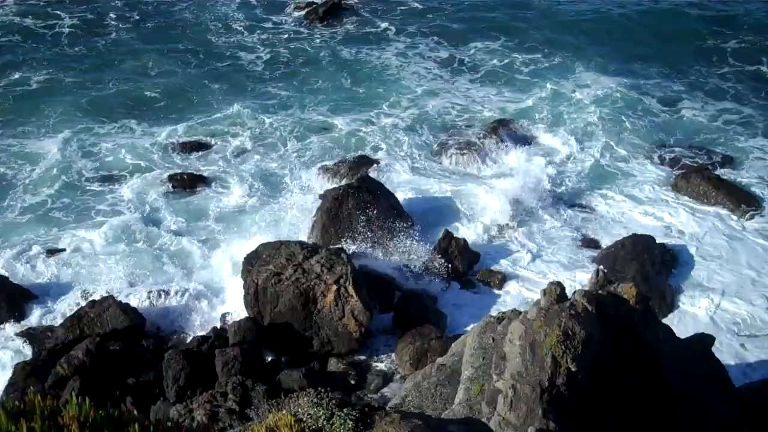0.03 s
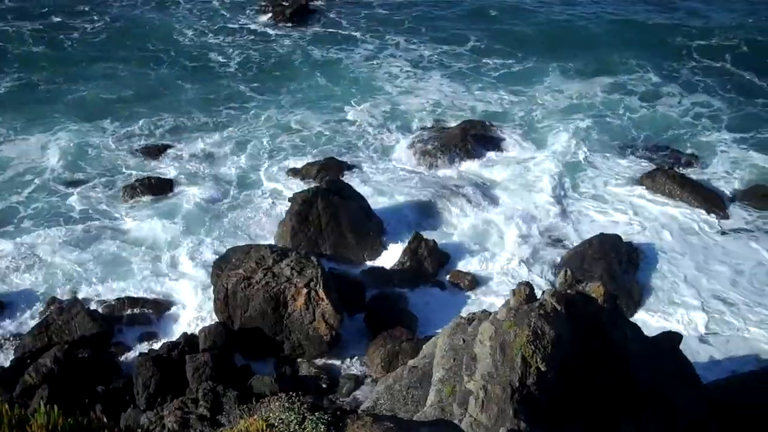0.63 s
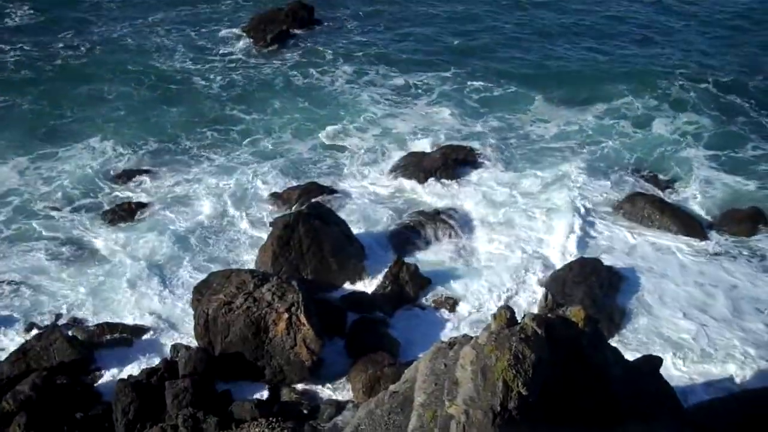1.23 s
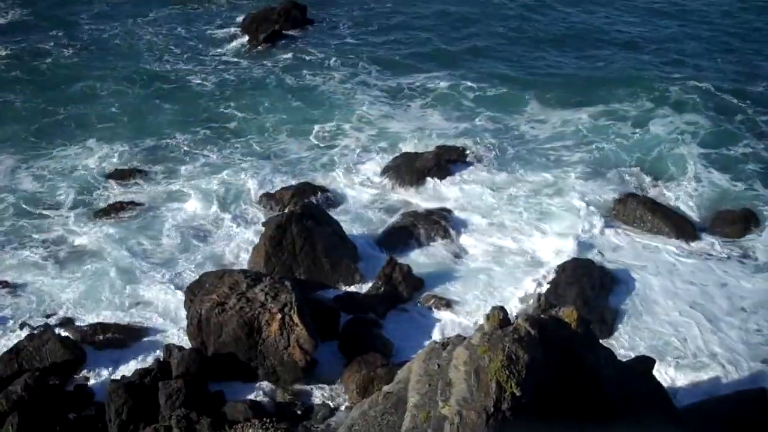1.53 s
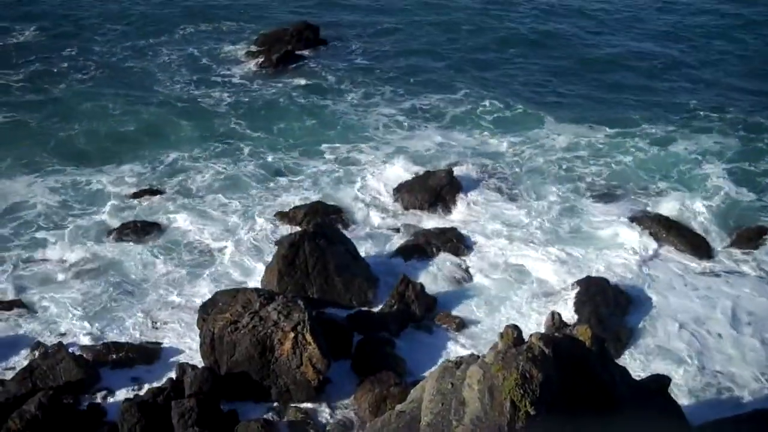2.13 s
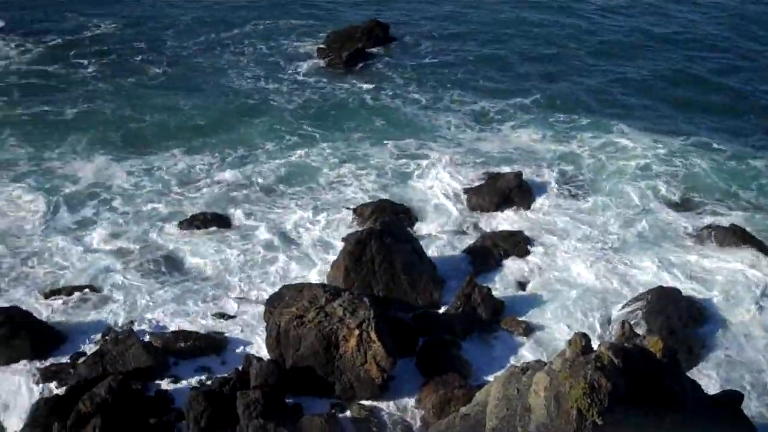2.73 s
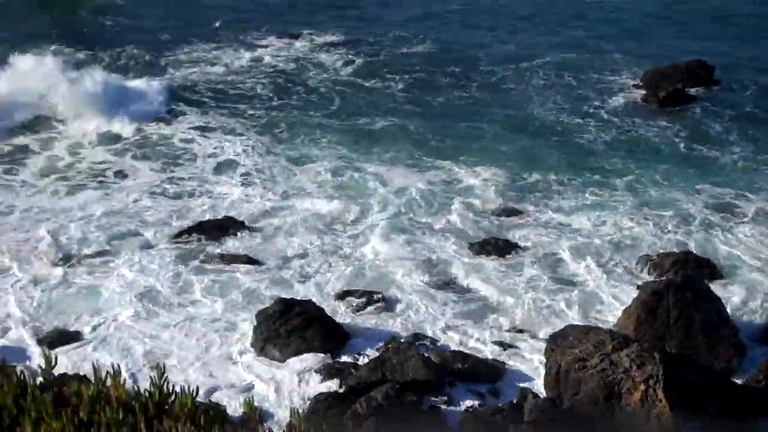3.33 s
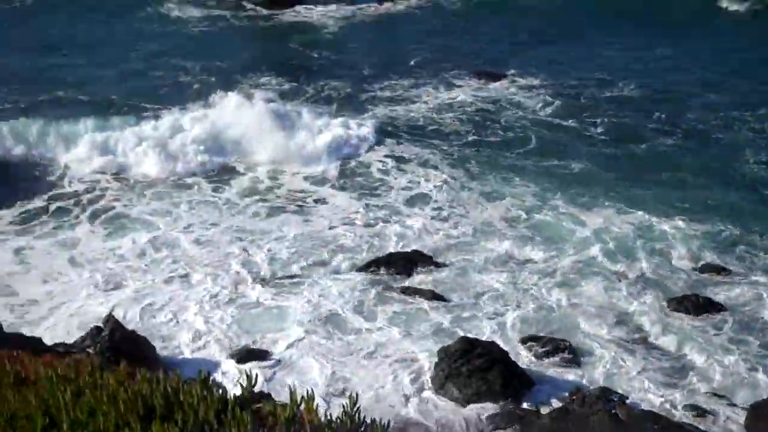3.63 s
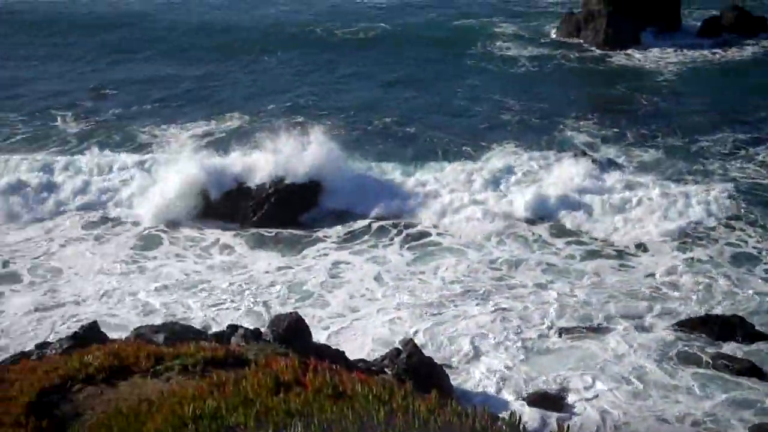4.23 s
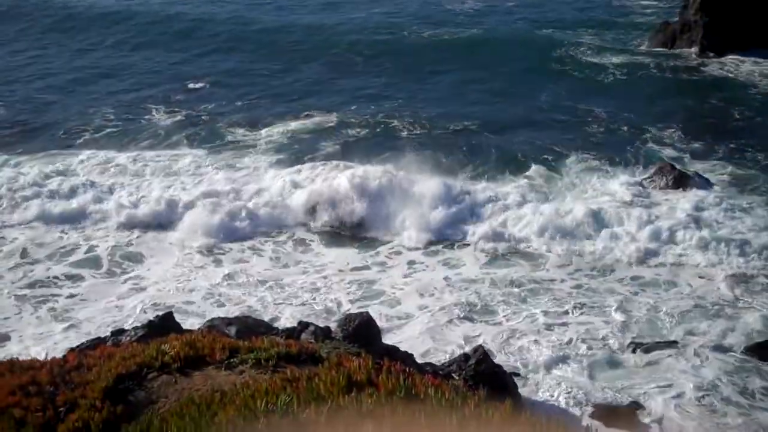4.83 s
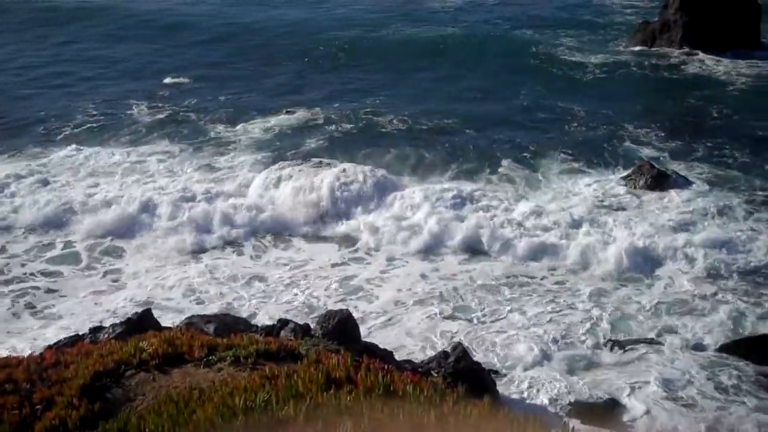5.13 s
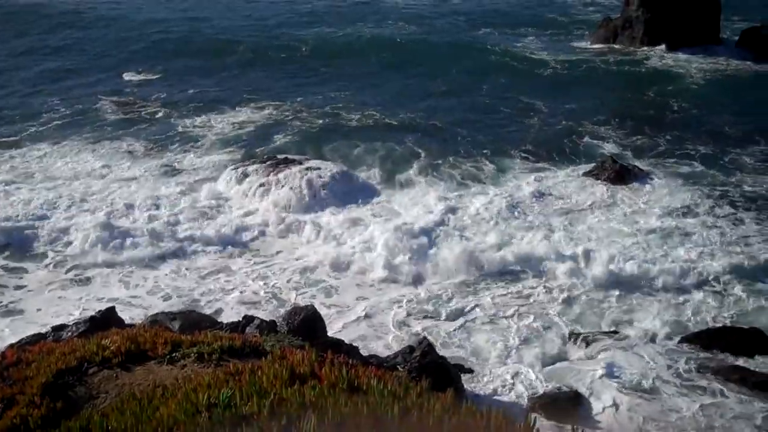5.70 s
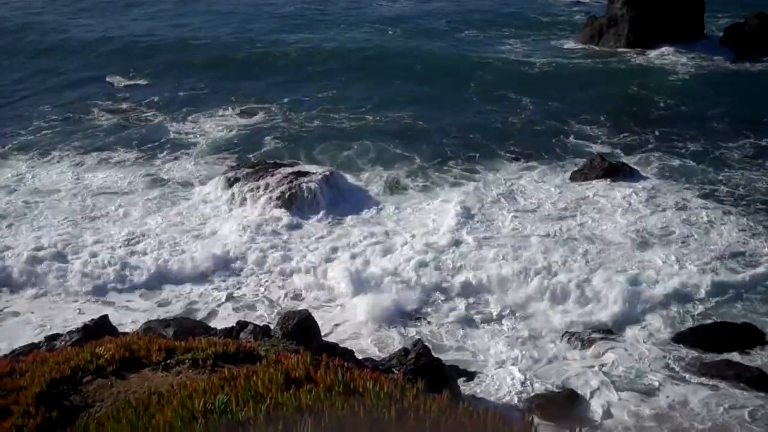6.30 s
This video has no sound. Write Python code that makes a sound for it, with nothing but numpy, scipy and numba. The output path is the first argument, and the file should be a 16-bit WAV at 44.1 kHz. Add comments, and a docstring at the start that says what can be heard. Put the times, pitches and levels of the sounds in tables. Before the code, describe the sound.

Ocean surf roars steadily over coastal rocks, swelling gently as waves burst into hissing spray, heard from a bluff above.

```python
"""A wave bursts on the rocks over the steady roar of surf, heard from the bluff above.
Air trapped in water rings at a pitch set by its size: big pockets roar, bubble clouds wash over the
rocks and fine spray hisses, all above a low rumble. The roar has brief hollow swells. One wave drains
away; the next rolls in and bursts on a boulder. The sound enters the two small ports of a hand-held
camera: turning it shifts the delay between them, and each port adds its own treble resonance."""
import sys
import numpy as np
from scipy import signal
from scipy.fft import rfft, irfft
from scipy.io import wavfile
from scipy.ndimage import uniform_filter1d, map_coordinates
from numba import njit

SR = 44100
rng = np.random.default_rng(int(sys.argv[2]) if len(sys.argv) > 2 else 0)


def inscribe(sig):
    """Save sig as 16-bit PCM at rate SR to the path in sys.argv[1].

    A 1-D sig is mono; a 2-D sig holds one channel per row.
    Samples are clipped to [-1, 1] before scaling.
    """
    pcm = np.round(np.clip(np.atleast_2d(sig).T, -1, 1) * 32767)
    wavfile.write(sys.argv[1], SR, pcm.astype(np.int16))


N = 284886
TIME = np.arange(N) / SR
FREQ = np.maximum(np.arange(N // 2 + 1) * SR / N, 1)
PAN = np.array([[.5], [-.5]])  # splits a left-minus-right level difference between the ports


def undb(db):
    """Decibels to amplitude ratio."""
    return 10 ** (np.asarray(db) / 20)


def unit(x):
    """Normalisation to rms 1."""
    return x / np.sqrt(np.mean(x ** 2))


def spectrum_at(table, hz):
    """Interpolation on a log-frequency axis."""
    table_hz, value = np.transpose(table)
    return np.interp(np.log(hz), np.log(table_hz), value)


def wander(rate_hz):
    """Random modulation: straight ramps between random values, rms 1."""
    step = max(int(SR / rate_hz), 2)
    held = np.repeat(rng.standard_normal(N // step + 1), step)
    return unit(uniform_filter1d(held, step)[:N])


# Likeness of the surf at the two ports: frequency_hz, coherence (0 to 1)
COHERENCE = [(25, .4), (60, 0.78), (130, 1), (750, 0.95), (1400, 0.78), (2050, 0.68), (2600, 0.82),
             (4200, 0.17), (5400, 0.48), (7000, 0.27), (9000, 0.04), (14000, 0.4)]


def noise_cloud(spectrum, width, surge_db, surge_hz, flicker_db, flicker_hz):
    """Incoherent summation: countless sources merge into noise; bands surge together, flicker apart."""
    spectra = rfft(rng.standard_normal((2, N))) * undb(spectrum_at(spectrum, FREQ))
    surge = surge_db * wander(surge_hz)
    half_octaves = 2 * np.log2(FREQ)
    low_hz, high_hz = spectrum[0][0], spectrum[-1][0]
    out = 0
    for band in range(int(2 * np.log2(low_hz)), int(2 * np.log2(high_hz)) + 2):
        window = np.sqrt(np.maximum(1 - np.abs(half_octaves - band), 0))
        mid, side = irfft(spectra * window, N)
        # a wider front of surf reaches the two ports less alike
        coherence = np.clip(spectrum_at(COHERENCE, 2 ** (band / 2)), .001, 1) ** width
        mid, side = mid * np.sqrt(1 + coherence), side * np.sqrt(1 - coherence)
        gain = undb(surge + flicker_db * wander(flicker_hz))
        out = out + gain * np.array([mid + side, mid - side])
    return unit(out)


@njit
def ring(starts, hz, cycles, gains, glide):
    """Damped oscillation: each bubble rings down, its pitch rising as it nears the surface."""
    out = np.zeros((2, N))
    for k in range(len(starts)):
        length = int(cycles[k] * SR / hz[k])
        for i in range(min(length, N - starts[k])):
            age = i / length
            pressure = np.exp(-5 * age) * np.sin(2 * np.pi * cycles[k] * age * (1 + glide * age / 2))
            out[0, starts[k] + i] += gains[k, 0] * pressure
            out[1, starts[k] + i] += gains[k, 1] * pressure
    return out


def bubbles(low_hz, high_hz, cycles, scatter_db, pan_db, glide, count):
    """Bubble resonance: the nearest bubbles ring singly at random times, many faint, a few strong."""
    when, pitch, life, size, place = rng.random((count, 5)).T
    starts = (when * N).astype(np.int64)
    hz = low_hz * (high_hz / low_hz) ** pitch
    level_db = -scatter_db * np.log(np.maximum(size, .01))
    gains = undb(level_db[:, None] + pan_db * np.outer(place - .5, [1, -1]))
    return unit(ring(starts, hz, cycles * (.5 + life), gains, glide))


# Spectrum of the deep rumble: frequency_hz, level_db
RUMBLE_SPECTRUM = [(20, -13), (45, -6), (72, -1.5), (150, -0.5), (230, -2.5), (400, -18)]


def rumble(width):
    """Low-frequency radiation: the weight of falling water shakes the air."""
    body = noise_cloud(RUMBLE_SPECTRUM, width, surge_db=1, surge_hz=8, flicker_db=.8, flicker_hz=12)
    return undb(-12) * body


# Brief hollow swells in the roar: start_s, pitch_hz, level_db, decay_s
HOLLOW_SWELLS = [(1.77, 860, -22, .05), (2.83, 805, -22, .05), (3.88, 750, -23.5, 0.081)]


def hollow_swells():
    """Band-pass resonance: noise near 800 Hz rises and dies away, a brief hollow note in the roar."""
    quality, attack_s = 4, .008
    out = np.zeros(N)
    for start_s, pitch_hz, level_db, decay_s in HOLLOW_SWELLS:
        resonance = 1 / (1 + 1j * quality * (FREQ / pitch_hz - pitch_hz / FREQ))
        hollow = unit(irfft(rfft(rng.standard_normal(N)) * resonance, N))
        age = np.maximum(TIME - start_s, 0)
        out += undb(level_db) * hollow * (1 - np.exp(-age / attack_s)) * np.exp(-age / decay_s)
    return out


# Spectrum of the spray: frequency_hz, level_db
SPRAY_SPECTRUM = [(700, -37), (2000, -2), (3500, 3), (4500, 1.5), (7000, -2), (8800, -7), (11500, -7),
                  (14000, -6.5)]


def spray(width):
    """Impact noise and small-bubble resonance: drops fall back and the foam fizzes."""
    body = noise_cloud(SPRAY_SPECTRUM, width, surge_db=.46, surge_hz=25, flicker_db=.5, flicker_hz=30)
    fizz = bubbles(3220, 10000, cycles=4.2, scatter_db=2.4, pan_db=6, glide=.1, count=14000)
    return undb(-4) * body + undb(-12) * fizz


# Spectrum of the foaming water: frequency_hz, level_db
WASH_SPECTRUM = [(300, -27), (900, -10.5), (1400, -0.5), (1900, -1.5), (3000, -6.5), (5000, -22.5),
                 (10000, -22.5)]


def wash(width):
    """Air entrainment: water churning between rocks folds in mid-sized bubbles that gurgle."""
    body = noise_cloud(WASH_SPECTRUM, width, surge_db=.5, surge_hz=18, flicker_db=.7, flicker_hz=22)
    gurgle = bubbles(990, 3150, cycles=18.6, scatter_db=3.5, pan_db=9, glide=.16, count=4000)
    return undb(.5) * body + undb(-8.5) * gurgle


# Spectrum of the breakers: frequency_hz, level_db
ROAR_SPECTRUM = [(120, -18), (210, -9), (290, -3.5), (490, -6.5), (630, -1), (780, 0.5), (1100, -4),
                 (1800, -25), (3500, -48)]


def roar(width):
    """Bubble resonance, lower for larger sizes: the big air pockets trapped by breakers gulp."""
    body = noise_cloud(ROAR_SPECTRUM, width, surge_db=.44, surge_hz=15, flicker_db=.3, flicker_hz=18)
    gulps = bubbles(228, 980, cycles=16, scatter_db=4.5, pan_db=1, glide=.14, count=1500)
    return undb(.15) * body + undb(-13.5) * gulps


# Churning of the water as one wave drains and the next rolls in: time_s, level_db
SWELL_LEVELS = [(0.3, -25), (0.75, -27.5), (1.4, -26.5), (2.4, -24.5), (3.8, -22.5), (4.5, -23.5),
                (5.1, -23.0), (6.3, -24)]


def swell(base_db, slope, delay_s):
    """Amplitude modulation: a layer's gain trails the swell, moving by slope dB for each dB of it."""
    time_s, level_db = np.transpose(SWELL_LEVELS)
    rise_db = np.interp(TIME - delay_s, time_s, level_db) - np.mean(level_db)
    return undb(base_db + slope * rise_db)


# Waves bursting on the rocks: peak_s, level_db, build_s, fall_s, pan_db (spray, left minus right)
BURSTS = [(0.33, -23.5, .55, 0.37, 3.5), (3.2, -27.5, 0.11, .36, 4), (3.65, -24.5, 0.37, 0.38, 1),
          (3.97, -25.5, 0.13, 0.34, -2), (4.98, -21.5, 0.34, .85, 1.4), (6.28, -24.5, 0.32, .55, -3)]


def burst_power(delay_s, spread):
    """Exponential growth and decay: each burst builds, then collapses; their powers add at each port."""
    power = 0
    for peak_s, level_db, build_s, fall_s, pan_db in BURSTS:
        age = TIME - peak_s - delay_s
        envelope = np.exp(np.minimum(age / build_s, -age / fall_s))
        power = power + (envelope * undb(level_db + spread * pan_db * PAN)) ** 2
    return power


# Where the surf lies as the camera turns: time_s, right_lag_ms, width (1 = usual)
CAMERA_AIM = [(.3, -0.015, 0.51), (.85, -0.026, 0.73), (1.5, 0.021, 1.7), (2.8, 0.07, 1.1),
              (3.85, 0.0013, 0.81), (4.4, -0.025, 0.66), (5.3, -0.014, 0.91), (6.3, -0.014, 1.7)]


def scene():
    """Superposition: the layers ride the swell and bursts add foam, then spray; turning shifts one port."""
    time_s, *columns = np.transpose(CAMERA_AIM)
    lag_ms, width = [np.interp(TIME, time_s, column) for column in columns]
    surf = swell(-27, slope=1.46, delay_s=.08) * rumble(width)
    surf += swell(-27.5, slope=1.05, delay_s=.08) * roar(width)
    # foam comes after the wave that made it
    steady_wash = swell(-27, slope=1, delay_s=.26)
    foam_power = undb(-6) ** 2 * burst_power(delay_s=0, spread=0)
    surf += np.sqrt(steady_wash ** 2 + foam_power) * wash(width)
    steady_spray = swell(-24.8, slope=.59, delay_s=.31) * undb(1.4 * PAN)
    drop_power = burst_power(delay_s=.055, spread=1)  # drops fly before they land
    surf += np.sqrt(steady_spray ** 2 + drop_power) * spray(width)
    left, right = surf + hollow_swells()
    lagged_index = np.arange(N) - lag_ms * SR / 1000
    return np.array([left, map_coordinates(right, [lagged_index], order=3, mode="nearest")])


# The camera's ports, left then right: bass_corner_hz, resonance_hz, bandwidth_hz
PORT_ACOUSTICS = [(111, 7446, 1105), (45, 5830, 770)]
# Extra dullness of the right port: frequency_hz, gain_db
RIGHT_PORT_DULLING = [(800, -0.18), (1600, -2.5), (3100, -1.5), (4400, -2.5), (6000, -2.7), (8300, -1),
                      (11000, -14.5)]


def record(dry):
    """Cavity resonance: each port rings like a tiny bottle; the bass is thinned and the top is cut."""
    start_s, fade_s, top_hz = .084, .0083, 14150
    response = []
    for bass_corner_hz, resonance_hz, bandwidth_hz in PORT_ACOUSTICS:
        highpass = 1j * FREQ / (bass_corner_hz + 1j * FREQ)
        ratio = FREQ / resonance_hz
        response.append(highpass / (1 - ratio ** 2 + 1j * ratio * bandwidth_hz / resonance_hz))
    response[1] *= undb(spectrum_at(RIGHT_PORT_DULLING, FREQ))
    switch_on = np.clip((TIME - start_s) / fade_s, 0, 1)
    heard = irfft(rfft(dry) * np.array(response), N) * switch_on
    lowpass = signal.ellip(10, .2, 70, top_hz, fs=SR, output="sos")
    return signal.sosfilt(lowpass, heard)


dry = scene()
out = record(dry)
inscribe(out)
```